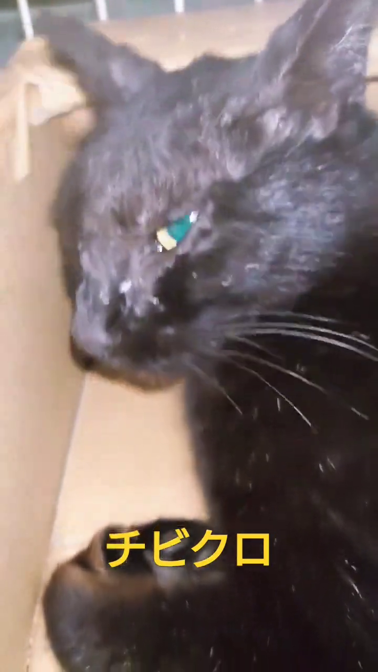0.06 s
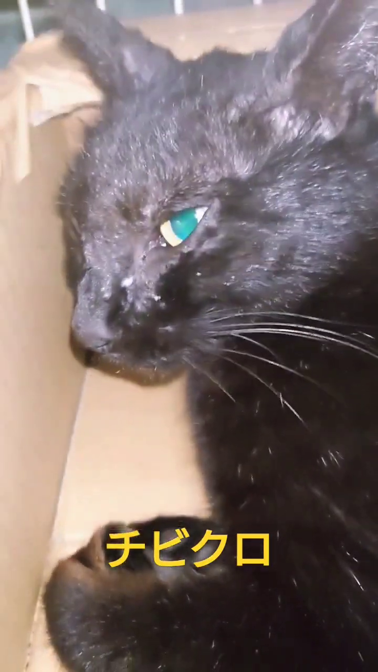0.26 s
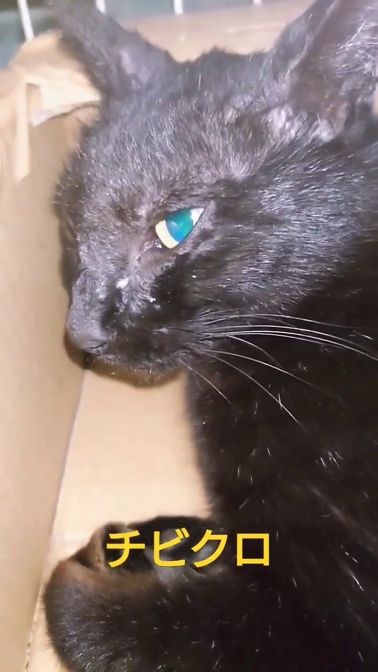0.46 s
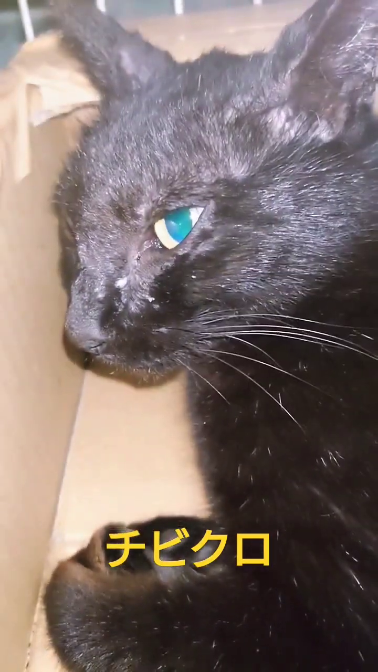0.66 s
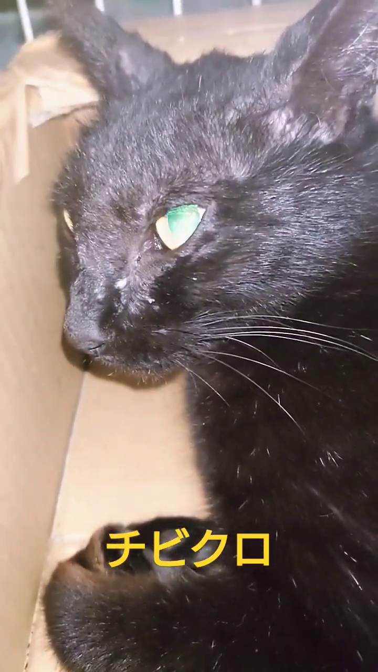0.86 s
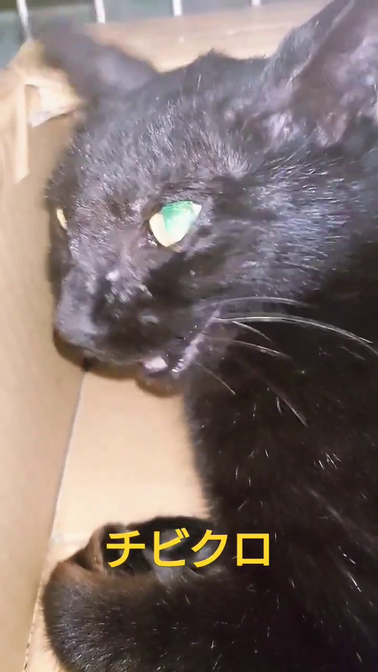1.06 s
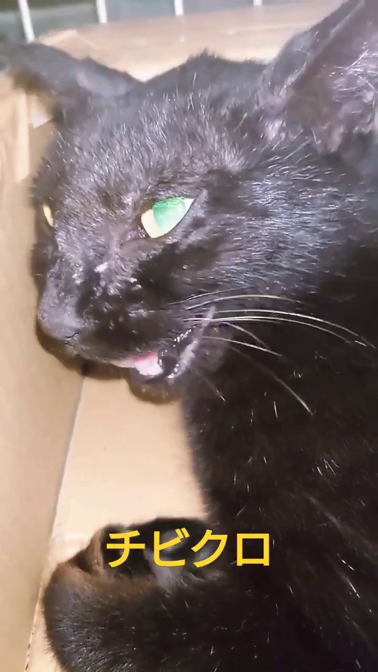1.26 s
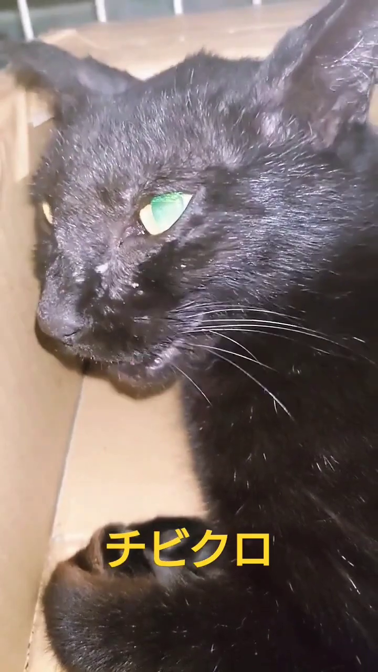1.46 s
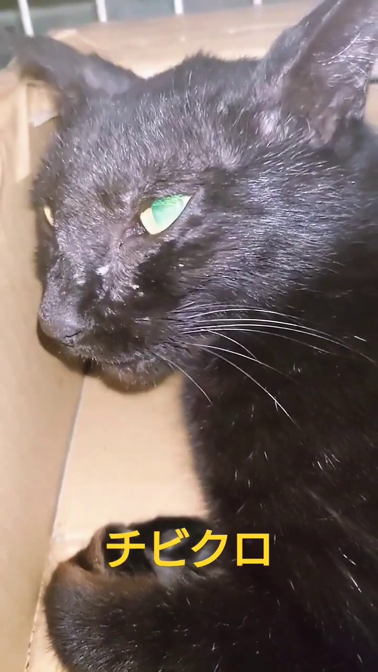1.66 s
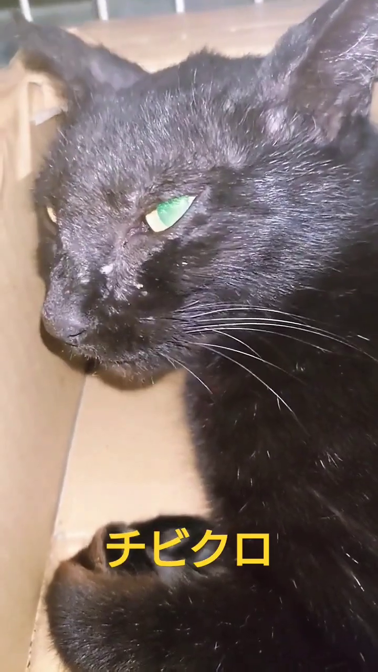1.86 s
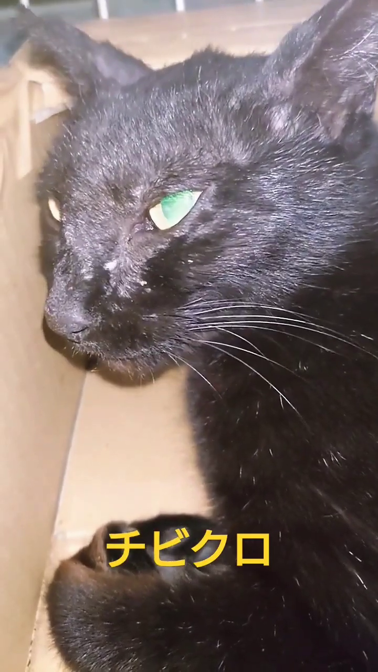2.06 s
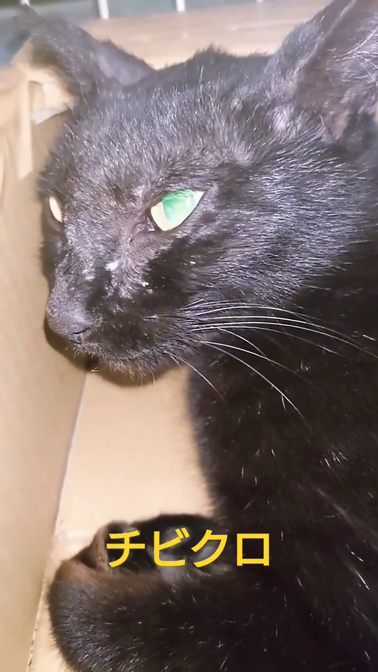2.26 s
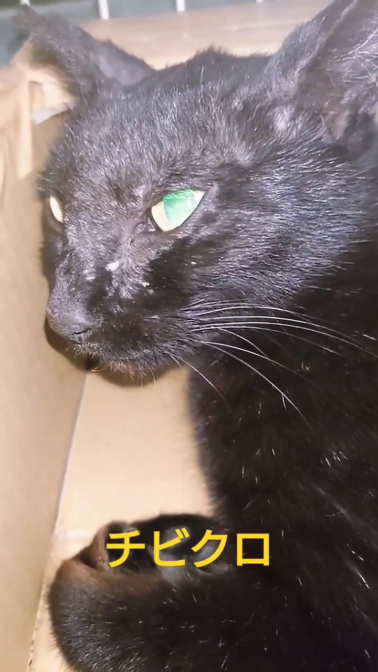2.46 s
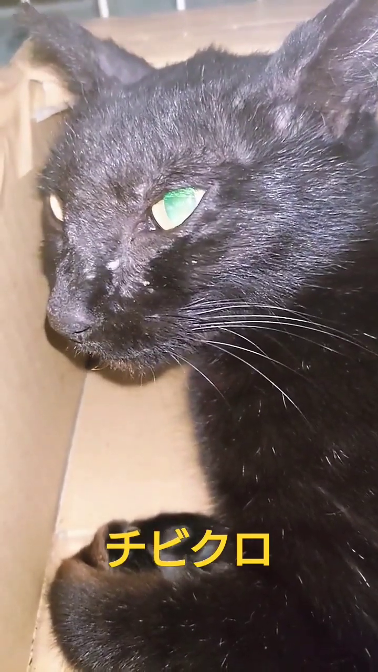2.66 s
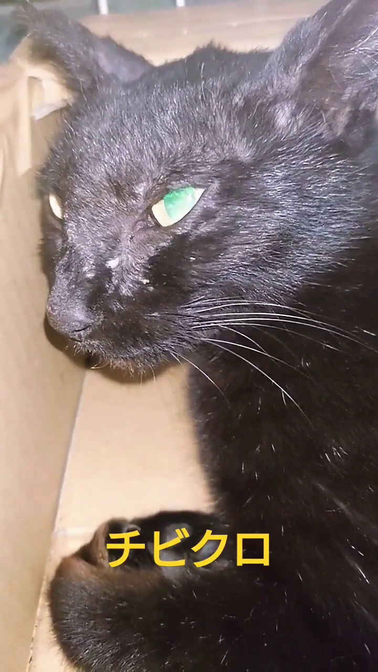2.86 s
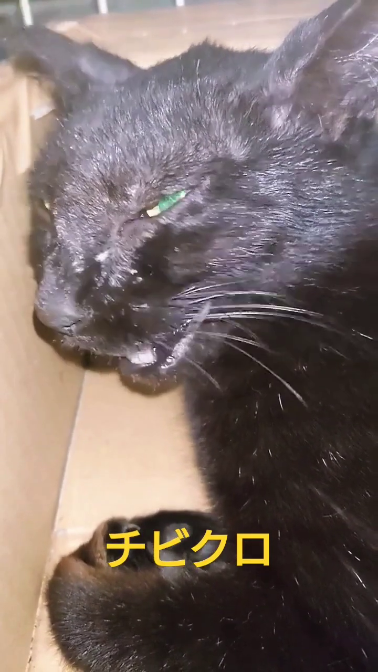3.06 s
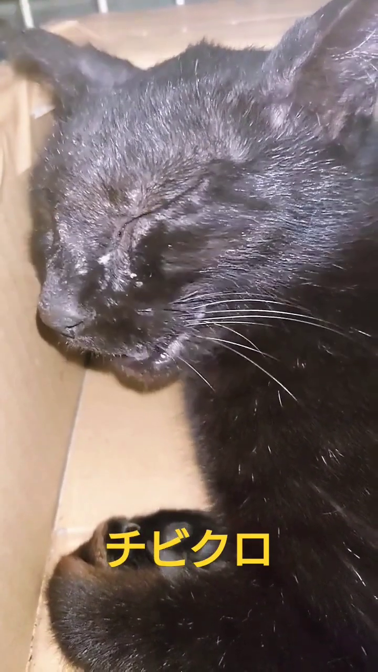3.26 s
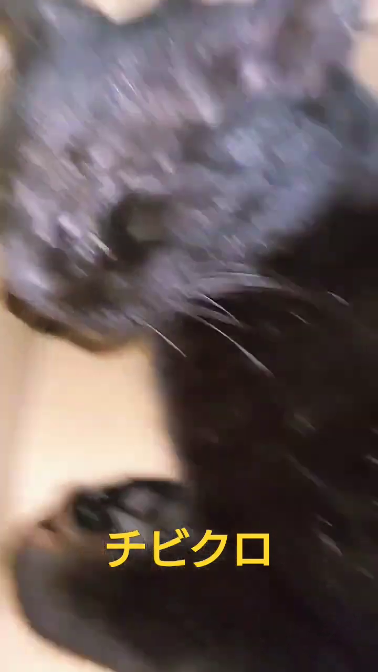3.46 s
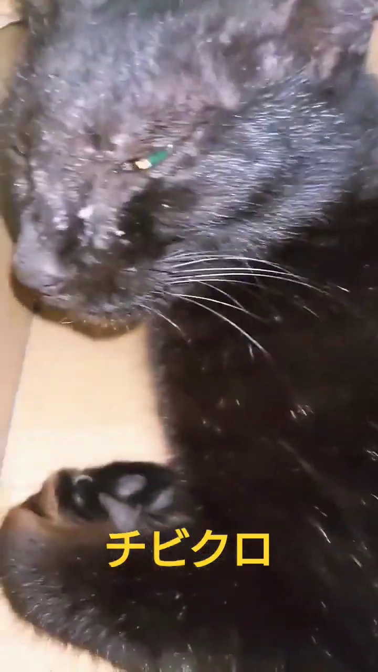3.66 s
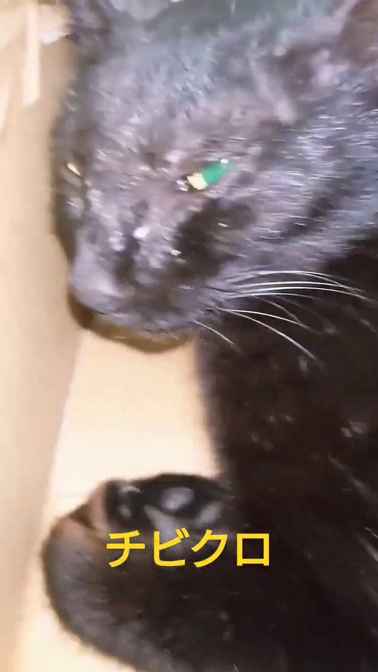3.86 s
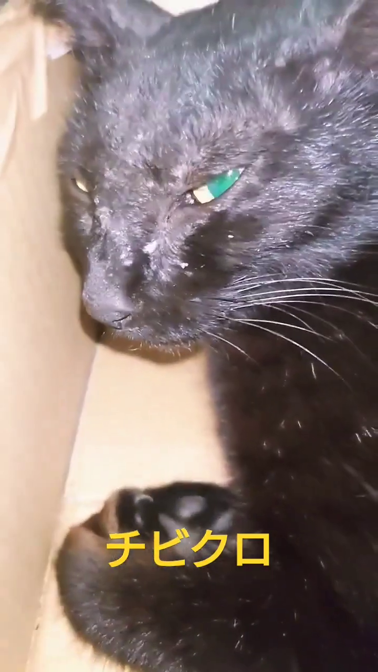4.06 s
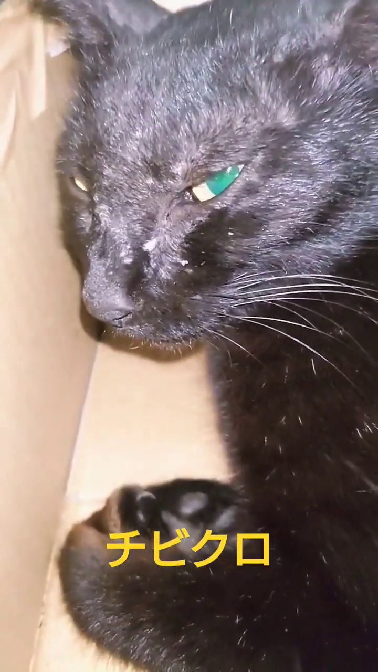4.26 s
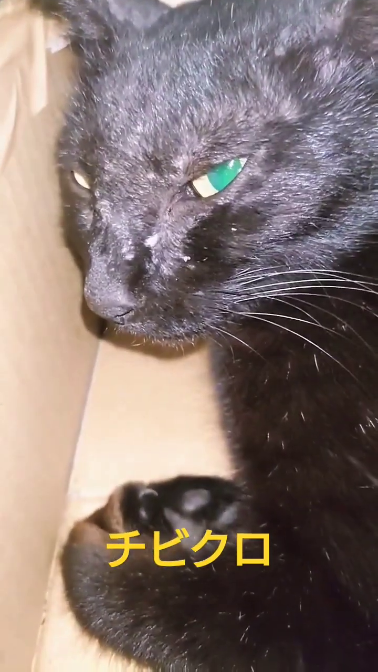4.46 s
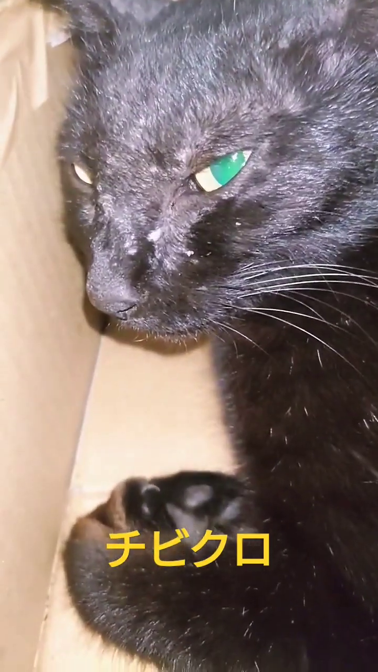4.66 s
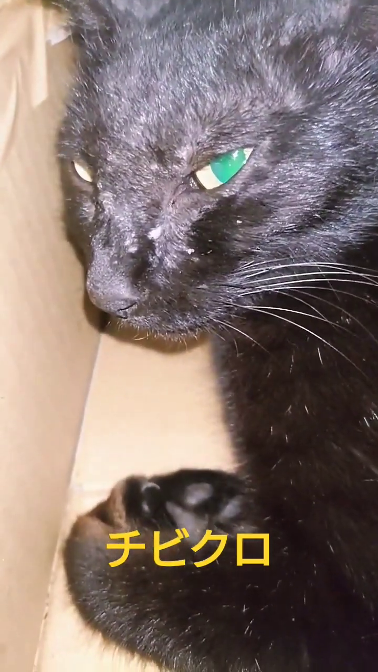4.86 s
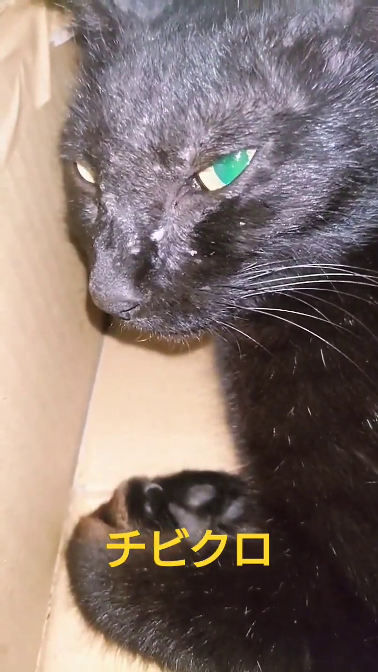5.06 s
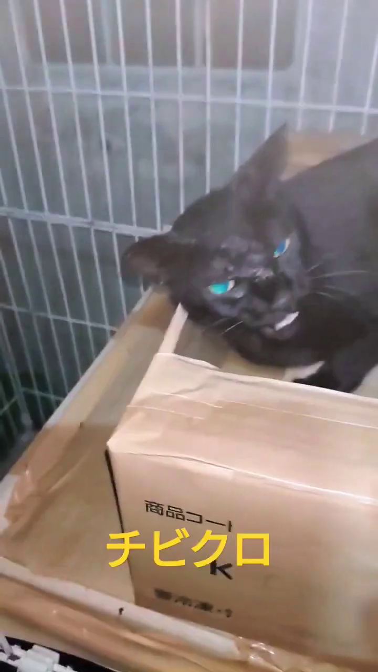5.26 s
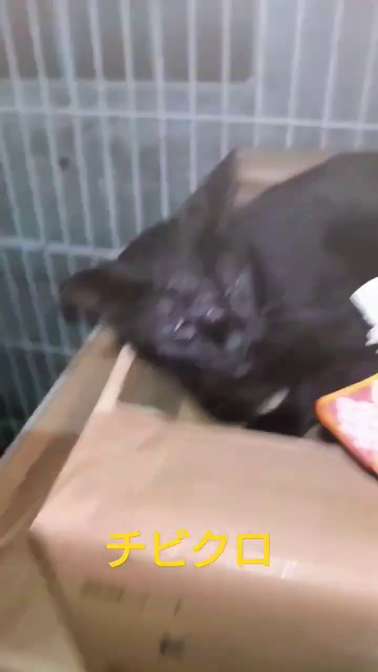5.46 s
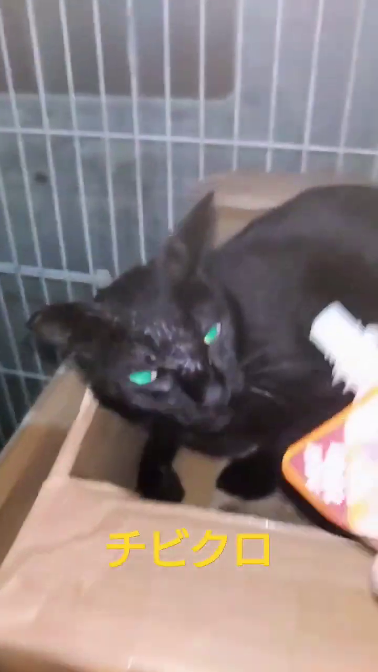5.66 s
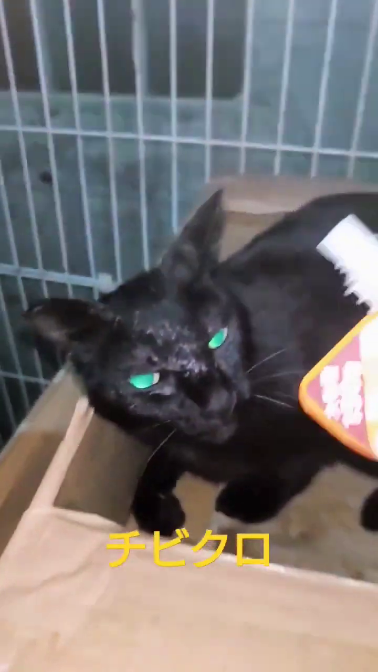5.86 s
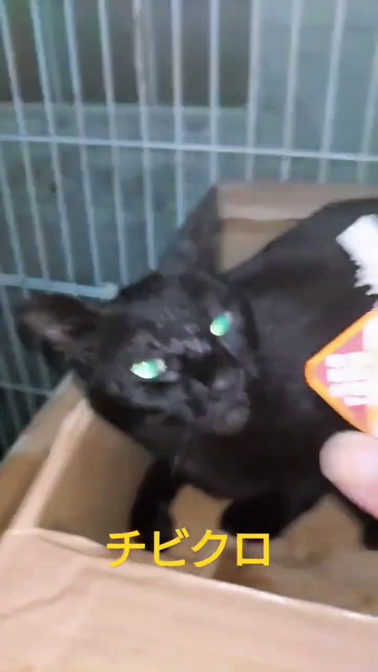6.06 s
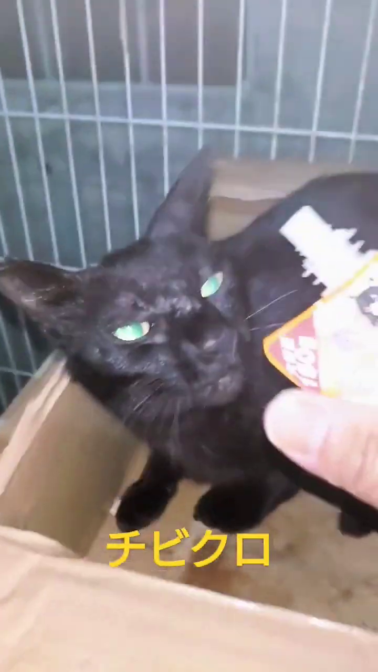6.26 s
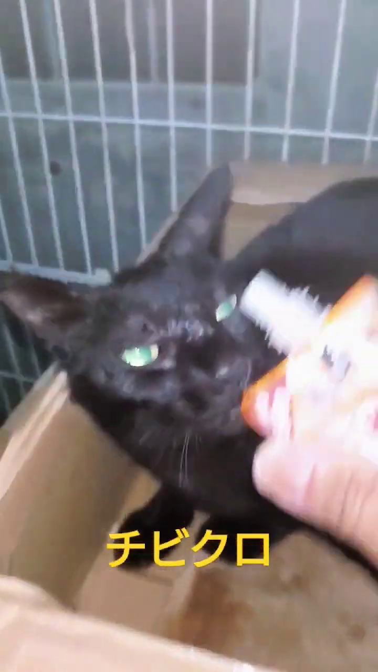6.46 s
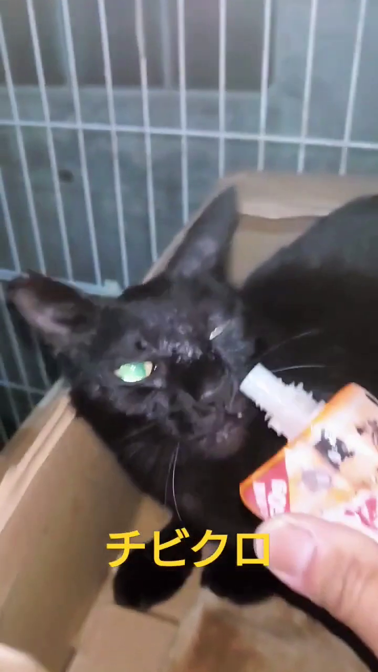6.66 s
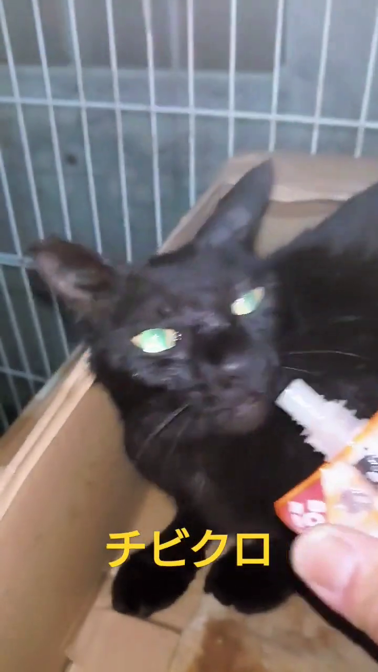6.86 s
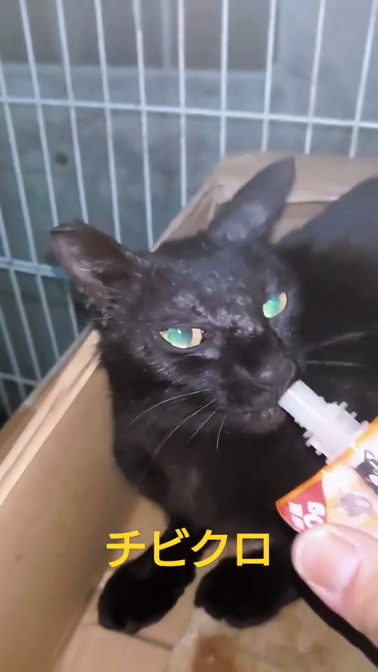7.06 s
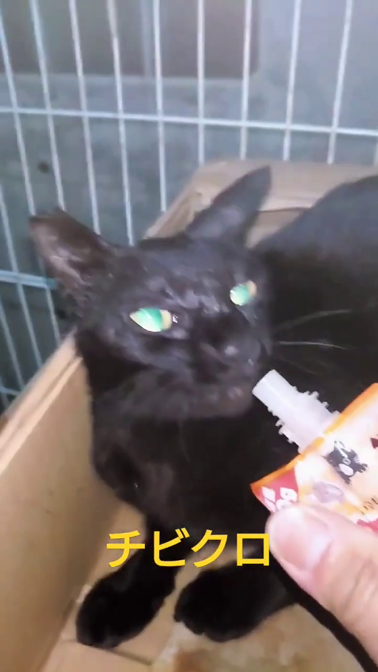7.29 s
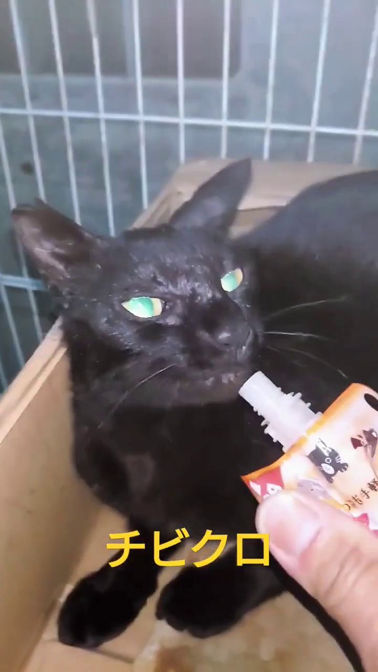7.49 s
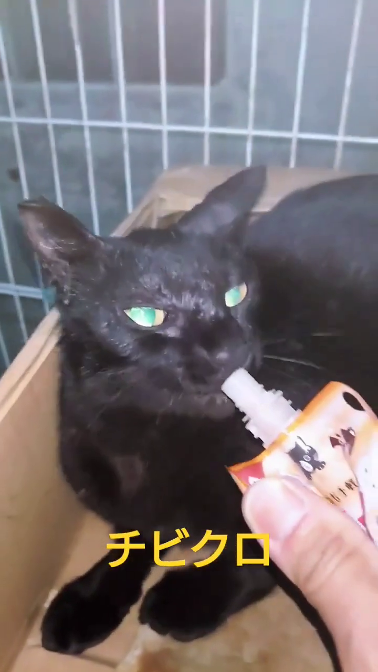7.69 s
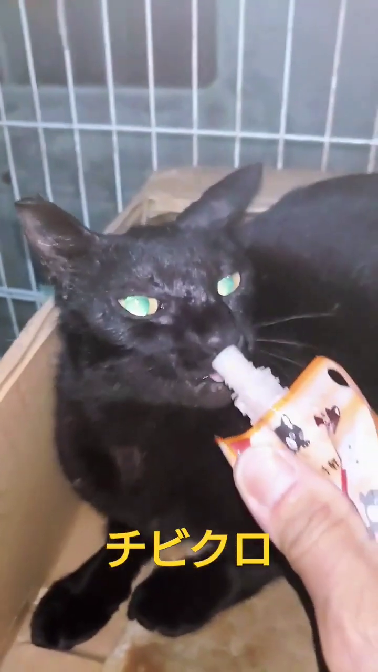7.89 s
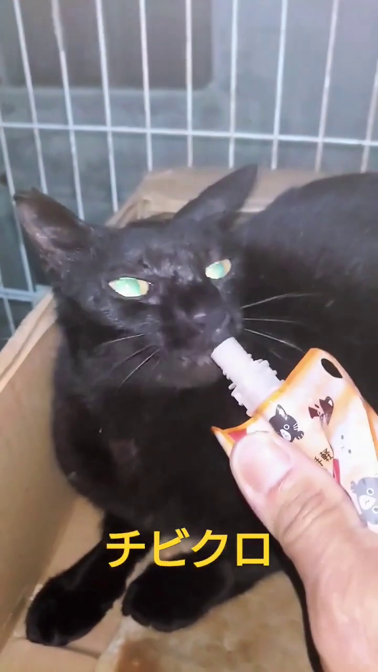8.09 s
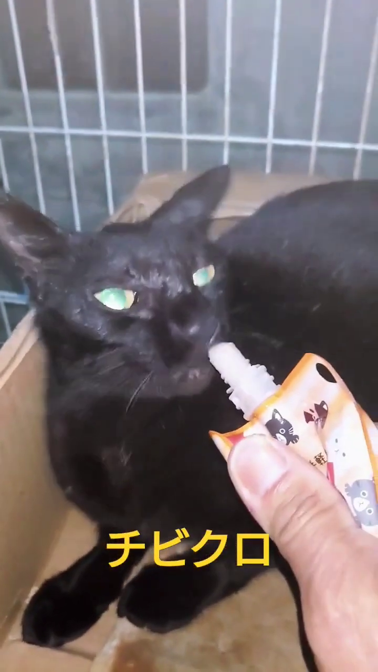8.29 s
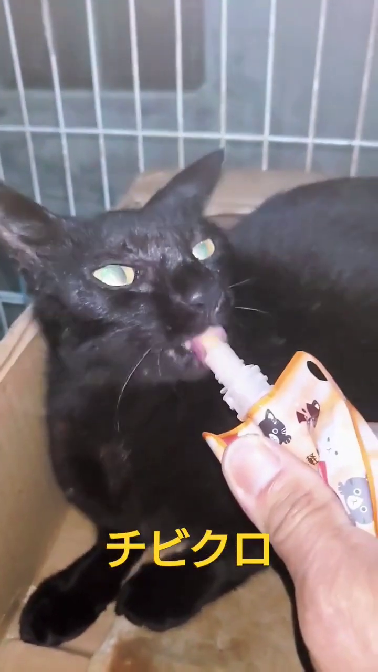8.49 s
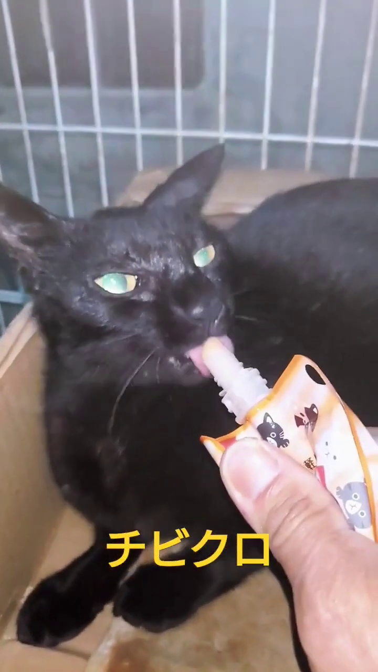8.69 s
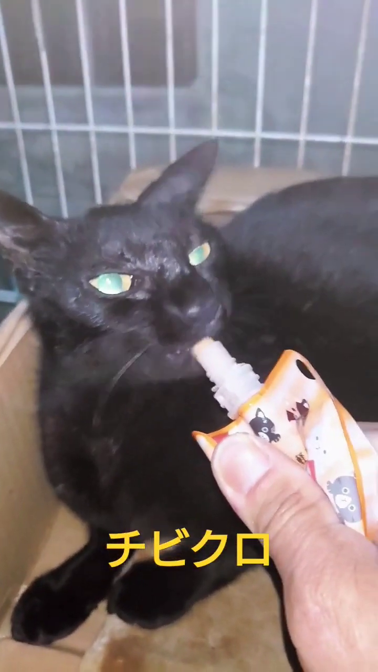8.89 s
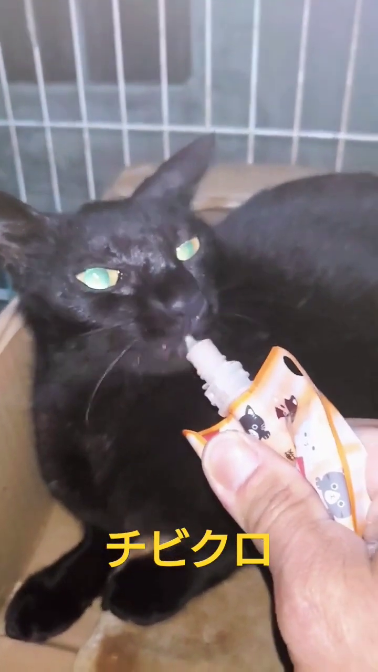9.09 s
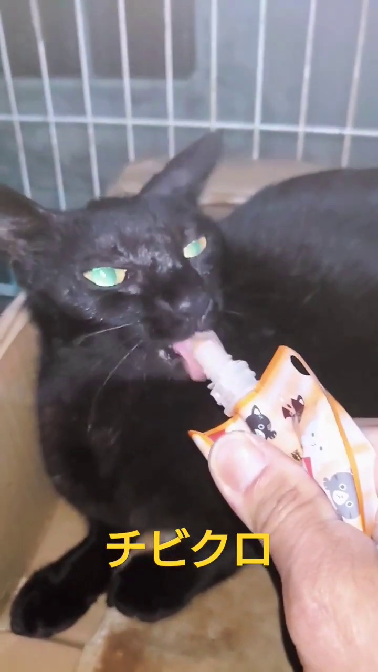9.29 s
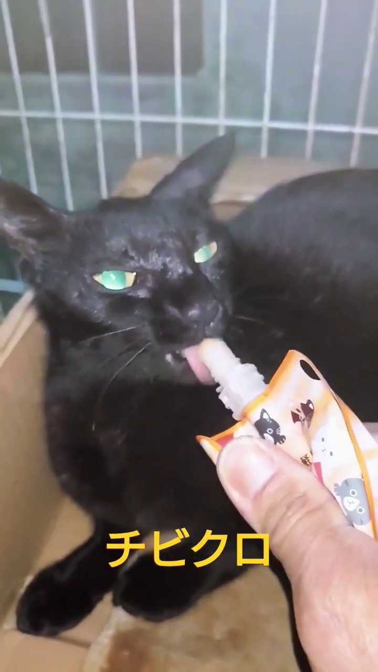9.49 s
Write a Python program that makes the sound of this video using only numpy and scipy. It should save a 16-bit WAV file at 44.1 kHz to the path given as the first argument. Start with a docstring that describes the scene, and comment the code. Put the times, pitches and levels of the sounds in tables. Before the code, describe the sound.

A cat meows in a small indoor space, caught closely in stereo by a phone with faint hiss. The end of a meow is already sounding at 0 and stops by 0.15 s. A full one, mid-high and slightly nasal, sags then lifts in pitch from 1.25 to 2.05 s; another similar follows from 3.15 to 3.7 s. Soft cardboard thumps and scuffs come at 3.6-4.1 s, with faint low rumble beneath. Near 5.27 s there is a tiny silent cut, then a thinner, bright meow from further off and aside until 5.77 s. Knocks, scuffs and crisp ticks cluster at 5.5-6.8 s, with a sharp tick at 7.0 s and quick dull mouth clicks around 7.1 s. Shifting calms; isolated clicks at 7.75, 7.95 and 8.37 s stand out, then only tiny lapping clicks remain until about 9.5 s.

```python
"""Small room, cardboard box: a cat inside meows four times close to a phone with two far-apart microphone ports.
Each meow sums overtones of the fold pulses, shaped by throat and moving mouth resonance, with breath noise.
A splice comes ahead of the last meow, which is heard from further off and aside.
Around and mostly after it the cat shifts: filtered noise scuffs and thuds knock on the cardboard; short ringing
bursts are the ticks of food pouch and claws and the clicks of the feeding mouth. Noise rumbles and hisses faintly."""
import sys
import numpy as np
from scipy import signal
from scipy.fft import rfft, irfft, next_fast_len
from scipy.io import wavfile
from scipy.ndimage import uniform_filter1d, map_coordinates

SR = 44100
rng = np.random.default_rng(int(sys.argv[2]) if len(sys.argv) > 2 else 0)


def to_linear_factor(level_db):
    """Convert decibel levels (scalar or array-like) to linear amplitude factors."""
    exponent = np.asarray(level_db, float) / 20
    return 10 ** exponent


def pcm_store(signal):
    """Save signal as 16-bit PCM."""
    levels = np.round(np.clip(np.atleast_2d(signal), -1, 1) * 32767)
    wavfile.write(sys.argv[1], SR, levels.astype(np.int16).T)


N = 420273

# Levels are set ahead of the microphones' own response.
# silence of the splice: start t/s, end t/s
SPLICE = (5.268, 5.287)

# room murmur and microphone hiss: f/Hz, relative density level/dB
AIR_SPECTRUM = [(41, -66), (70, 0), (207, -12), (311, -6.5), (1010, -21.5), (5900, -33), (7300, -40.5),
                (9000, -32.5), (15500, -34)]
# left-right likeness of the air: f/Hz, correlation
AIR_LIKENESS = [(900, 0.03)]
# left over right port in the air: f/Hz, L-R level/dB
AIR_TILT = [(80, -8.5), (1200, 0)]
# deep rumble: t/s, level/dB
RUMBLE = [(3.3, -60), (3.7, -55.5)]
AIR_DB = -73
# decay of the room: f/Hz, t60/s
ROOM_DECAY = [(300, 0.38), (10000, 0.0082)]

# resonances of the cardboard wall: f/Hz, width/Hz, relative level/dB
BOX_MODES = [(95, 70, -6), (250, 13, 3), (340, 60, -3), (620, 250, -15)]
# knocks on the box wall: t/s, peak level/dB as the mean of both ports
KNOCKS = [(3.636, -48), (3.682, -37), (3.744, -38), (3.795, -42.5), (5.548, -39), (5.637, -27.5),
          (5.671, -33.5), (5.818, -42.5), (6.094, -33), (6.179, -42), (6.537, -42.5), (6.605, -37),
          (6.654, -41), (8.374, -45.5)]
# colour of the scuffs: f/Hz, relative density level/dB
SCUFF_SPECTRUM = [(380, -21), (680, 1), (1090, -5), (2570, -8), (4400, -22), (5700, -15), (6900, -29),
                  (9000, -19.5)]
# strokes of fur and paws on cardboard: start t/s, length/s, wall level/dB, scuff level/dB
STROKES = [(3.618, 0.17, -61.5, -67), (3.895, 0.22, -64, -74), (4.955, 0.11, -66, -98.5),
           (5.609, 0.042, -57, -59), (5.95, 0.083, -83, -59), (6.092, 0.018, -52, -60),
           (6.174, 0.03, -76, -61), (6.519, 0.037, -47, -57.5), (6.589, 0.08, -49, -61.5),
           (6.784, 0.0048, -49, -61)]
# the cat's steady shifting after the splice, calming as it feeds: t/s, wall level/dB, scuff level/dB
RESTLESS = [(5.287, -73, -64), (5.7, -53.5, -66), (6.0, -66.5, -67), (6.35, -60.5, -64.5), (6.7, -63, -72),
            (7.3, -58, -65.5), (7.46, -76.5, -70), (7.8, -69, -74.5), (8.3, -79.5, -76.5),
            (8.6, -64.5, -76.5), (9.53, -84.5, -79.5)]
RISE_DB_PER_S, FALL_DB_PER_S = 591, 171

# snaps of pouch and claws: t/s, body peak level/dB, own ring f/Hz, crack level/dB re body
TICKS = [(3.622, -40.5, 2500, 9.5), (3.743, -37, 4100, 10.5), (5.6171, -29, 2400, -16),
         (5.637, -31, 2280, -6), (5.6694, -34, 2998, -3.5), (5.9558, -24, 2380, 3), (6.0843, -32, 2130, 1),
         (6.1785, -33.5, 3830, 2), (6.7793, -42.5, 1180, -20), (7.001, -24.5, 2420, -4),
         (7.473, -50.5, 5560, 0), (7.9489, -29, 3380, -8.5), (8.7001, -44, 1900, -13),
         (8.9476, -43, 2020, -14)]
# dull clicks of tongue and lips: t/s, body peak level/dB, own ring f/Hz
SMACKS = [(6.093, -37, 1160), (6.485, -44, 780), (6.947, -46, 1730), (6.983, -44, 2200),
          (7.0929, -37, 1820), (7.1118, -39, 1810), (7.134, -39.5, 1730), (7.192, -40, 1780),
          (7.611, -51.5, 1640), (7.751, -31.5, 1280), (8.118, -51.5, 1600), (8.208, -55, 1420),
          (8.279, -53, 2230), (8.3731, -34, 1510), (8.6794, -51.5, 2300), (9.107, -53, 2400),
          (9.213, -49, 2300)]
SMACK_CRACK_DB = -71  # re body
# ring of the plastic crack: f/Hz, width/Hz, relative level/dB
PLASTIC_MODES = [(5530, 730, 31), (10500, 3100, -21)]
# air in the box answering each click: f/Hz, width/Hz, relative level/dB
HOLLOW_MODES = [(876, 810, -2.5), (2230, 170, 8)]
HOLLOW_DB, HOLLOW_T60_S = -17.5, 0.19  # level re click

# meows: t/s, mean pitch f/Hz, fundamental level/dB, mouth overtone level/dB, mouth resonance f/Hz
MEOWS = [
    [(0.0, 491, -37, -54.5, 2870), (0.06, 511.5, -38, -62.5, 3000), (0.145, 521, -38.5, -61.5, 2760)],
    [(1.247, 548, -44, -49, 2850), (1.3, 525.6, -40, -41, 2710), (1.37, 496.5, -35.5, -39.5, 3190),
     (1.45, 470.6, -37.5, -39.5, 3380), (1.6, 471.3, -39, -47, 3308), (1.91, 478.6, -39, -58, 2910),
     (2.047, 512, -42, -58, 2852)],
    [(3.152, 531, -42, -48, 2590), (3.23, 488.3, -38.5, -42, 2720), (3.37, 454.1, -37, -40, 3070),
     (3.5, 465.5, -38, -47, 3050), (3.63, 480.2, -39.5, -56, 3100), (3.715, 527.4, -39.5, -57.5, 3175)],
    [(5.287, 429.2, -51.5, -39, 3370), (5.4, 445.6, -62, -41, 3550), (5.52, 451.7, -61.5, -46, 3550),
     (5.66, 479.5, -50.5, -63, 3050), (5.722, 474.6, -62, -59, 3240), (5.728, 459, -60, -69, 3250),
     (5.765, 432, -44.5, -64, 2716)],
]
# every second fold cycle turns weaker: centre t/s, spread/s, share 0-1
DOUBLING = [(0.093, 0.054, 0.14), (1.981, 0.039, 0.36), (3.691, 0.024, 0.39), (5.74, 0.03, 0.18)]
# throat resonances from the front: f/Hz, width/Hz, relative level/dB
NEAR_THROAT_MODES = [(696, 2500, 5.5), (1530, 2200, 5.8)]
# throat resonances from aside: f/Hz, width/Hz, relative level/dB
FAR_THROAT_MODES = [(930, 200, 3.5), (1680, 1100, -7.5)]
# skull ringing with the mouth: f/Hz, width/Hz, relative level/dB
SKULL_MODES = [(5794, 320, -2), (7060, 380, -4), (9100, 2700, -13)]
# voice at the ports before the splice: f/Hz, L-R level/dB
NEAR_TILT = [(150, -6.5), (1000, -10), (2800, -6), (8000, -33)]
# voice at the ports after the splice: f/Hz, L-R level/dB
FAR_TILT = [(400, -2), (1300, 2.5), (8000, -9)]
# a pocket under the tongue swallows a band this far below the mouth resonance
DIP_BELOW_HZ, DIP_WIDTH_HZ, DIP_DB = 720, 600, -1
# throat overtones follow the mouth's level part of the way from LOUD_DB
LOUD_DB, NEAR_THROAT_DB, NEAR_FOLLOW, FAR_THROAT_DB, FAR_FOLLOW = -36.5, -37, 0.47, -39.5, 0.26
# they start weaker at the onset and fade as the folds slacken
ONSET_S, ONSET_CUT_DB, SLACKEN_S, SLACKEN_DB = 0.061, 5.5, 0.042, 11
# mouth overtones fade above CLEAR_HZ; the breath, re mouth level, outlasts the voice
CLEAR_HZ, BREATH_DB, SIGH_S = 10500, -17.5, 0.03
NEAR_JITTER, FAR_JITTER = 0.004, 0.0065  # unsteadiness of the pitch, share

NEAR_LEAD_S, FAR_LEAD_S, TICK_LEAD_S = 0.00019, 0.00006, 0.00012  # left port hears first
MIC_TOP_HZ = 15750


def unit(x):
    """Scale to rms 1."""
    return x / np.sqrt(np.mean(x ** 2) + 1e-20)


def along(points, hz):
    """Interpolate (f/Hz, value) points on a log frequency axis."""
    f, v = np.transpose(points)
    return np.interp(np.log(hz + 1), np.log(f + 1), v)


def curves(rows, t, outside=None):
    """Interpolate each column after the first over time."""
    s, *cols = np.transpose(rows)
    return [np.interp(t, s, c, outside, outside) for c in cols]


def wobble(rate, size=N):
    """A smooth random curve with rate knots a second."""
    knots = rng.standard_normal(int(size * rate / SR) + 4)
    return map_coordinates(knots, [np.arange(size) * rate / SR])


def filtered(x, response):
    """Multiply the spectrum of x by a response of frequency."""
    n = x.shape[-1]
    m = next_fast_len(n + 8192)
    return irfft(rfft(x, m) * response(np.fft.rfftfreq(m, 1 / SR)), m)[..., :n]


def ringing(f, modes):
    """Causal response of (f/Hz, width/Hz, level/dB) resonances, with alternating signs."""
    total = 0
    for k, (centre, width, db) in enumerate(modes):
        damping = 1j * f * width
        total = total + (-1) ** k * to_linear_factor(db) * damping / (centre * centre - f * f + damping)
    return total


def ports(x, tilt, lead_s):
    """Two ports hear one source at unlike level and time; their mean keeps the source's level."""
    def pair(hz):
        g = to_linear_factor(along(tilt, hz) / 2) * np.exp(1j * np.pi * hz * lead_s)
        return np.array([g, 1 / g]) / np.abs(g + 1 / g) * 2
    return filtered(x, pair)


def rush(gain, alike, patchy_db):
    """Stereo noise, rms 1 in its mid, with random patches of gain and a set left-right likeness."""
    z = signal.stft(rng.standard_normal((2, N)), nperseg=512)[2]
    field = rng.standard_normal(z.shape[1:])
    field = uniform_filter1d(uniform_filter1d(field, 6, 0), 8, 1)
    pair = signal.istft(z * to_linear_factor(patchy_db * unit(field)), nperseg=512)[1][:, :N]

    def mid_side(hz):
        turn = np.arccos(np.clip(along(alike, hz), -1, 1)) / 2
        return gain(hz) * [np.cos(turn), np.sin(turn)]
    mid, side = filtered(pair, mid_side)
    return np.array([mid + side, mid - side]) / np.std(mid)


def air():
    """Deep uneven rumble under the room's murmur and the microphone hiss, all filtered noise."""
    still = rush(lambda f: to_linear_factor(along(AIR_SPECTRUM, f)), AIR_LIKENESS, patchy_db=1.5)
    still = filtered(still, lambda f: to_linear_factor(along(AIR_TILT, f) * [[0.5], [-0.5]]))
    deep = rush(lambda f: np.abs(ringing(f, [(34, 30, 0)])) ** 4, [(30, 0.55)], patchy_db=0)
    rumble_db = curves(RUMBLE, np.arange(N) / SR)[0]
    return to_linear_factor(AIR_DB) * still + to_linear_factor(rumble_db) * deep * to_linear_factor([[-3.2], [2.2]])


def room(x):
    """The room answers with a noise tail in which each frequency dies at its own speed."""
    hz, t, z = signal.stft(rng.standard_normal((2, SR // 2)), SR, nperseg=256)
    decay = to_linear_factor(-60 * t / along(ROOM_DECAY, hz)[:, None])
    tail = signal.istft(z * decay, SR, nperseg=256)[1]
    late = np.pad(x, (300, 0))[None]  # first answer after 300 samples
    return signal.fftconvolve(late, tail / np.linalg.norm(tail[0]), axes=1)[:, :N]


def strokes(t):
    """Wall and scuff gains: every stroke rises, holds and falls, adding power to the steady shifting."""
    wall, scuff = to_linear_factor(np.array(curves(RESTLESS, t, -120))) ** 2
    for s, length, wall_db, scuff_db in STROKES:
        rise_db = -RISE_DB_PER_S * np.maximum(s - t, 0)
        fall_db = -FALL_DB_PER_S * np.maximum(t - s - length, 0)
        shape = to_linear_factor(rise_db + fall_db) ** 2
        wall = wall + to_linear_factor(wall_db) ** 2 * shape
        scuff = scuff + to_linear_factor(scuff_db) ** 2 * shape
    return np.sqrt(wall), np.sqrt(scuff)


def box():
    """Paws knock the cardboard; dragging fur shakes the wall and scuffs in clumped grains."""
    t = np.arange(N) / SR
    push = np.pad(np.hanning(44), (0, SR // 10))
    thud = filtered(push, lambda f: ringing(f, BOX_MODES))
    knock = np.zeros(N)
    for s, db in KNOCKS:
        knock[round(s * SR):][:len(thud)] += to_linear_factor(db) * thud / np.abs(thud).max()

    def wall_tone(f):
        return np.abs(ringing(f, BOX_MODES)) ** 0.9 / (1 + (f / 650) ** 4) / (1 + (110 / (f + 1)) ** 2)
    shake, scrape = strokes(t)
    wall = rush(wall_tone, [(200, 0.7)], patchy_db=2)
    scuff = rush(lambda f: to_linear_factor(along(SCUFF_SPECTRUM, f)), [(600, -0.34), (1600, -0.65)], patchy_db=1.8)
    bright = filtered(scuff, lambda f: np.abs(ringing(f, [(4030, 1730, 0.0093)])))
    scuff = scuff + scrape / to_linear_factor(-72.5) * bright  # harder strokes sound brighter
    grains = to_linear_factor(1.3 * wobble(35) + 2.6 * wobble(400))
    # each pair of levels is left and right port
    shaking = shake * to_linear_factor(1.8 * wobble(13)) * wall * to_linear_factor([[-1.6], [1.2]])
    scuffing = scrape * unit(grains) * scuff * to_linear_factor([[-4.5], [2.5]])
    return knock * to_linear_factor([[-2.5], [1.8]]) + shaking + scuffing


def ticks_and_smacks():
    """Short crackle rings a broad pitch of each click's own; the box answers with a fresh wash of noise."""
    clicks, wash = np.zeros(N), np.zeros((2, N))
    t = np.arange(6000) / SR
    rows = TICKS + [row + (SMACK_CRACK_DB,) for row in SMACKS]
    noises = rng.standard_normal((len(rows), 3, len(t)))
    for (s, db, hz, crack_db), (burst, *echo) in zip(rows, noises):
        start = round(s * SR)
        burst = burst * to_linear_factor(-60 * t * hz / 9)  # dies by 60 dB in nine cycles of its ring
        burst[0] = 4  # the first snap
        body = filtered(burst, lambda f: ringing(f, [(hz, 0.5 * hz, 0)]) ** 2 / (1 + 1j * f / (hz + 1500)) ** 2)
        crack = filtered(burst, lambda f: ringing(f, PLASTIC_MODES))
        click = body / np.abs(body).max() + to_linear_factor(crack_db) * crack / np.abs(crack).max()
        clicks[start:][:len(t)] += to_linear_factor(db) * click
        echo = unit(filtered(np.array(echo), lambda f: ringing(f, HOLLOW_MODES) / (1 + (f / 3200) ** 4)))
        wash[:, start:][:, :len(t)] += to_linear_factor(db + HOLLOW_DB - 60 * t / HOLLOW_T60_S) * echo
    return ports(clicks, [(1500, -15.5), (9000, -14)], TICK_LEAD_S) + wash


def meow(rows, loud_throat_db, follow, onset_cut_db, slacken_db, throat_modes, skull_db, cheek_db, jitter):
    """Fold pulses as overtones, shaped by throat and a moving mouth resonance, with breath once a cycle."""
    start, end = rows[0][0], rows[-1][0]
    t = np.arange(round(start * SR), round((end + 4 * SIGH_S) * SR)) / SR
    pitch, base_db, mouth_db, mouth_hz = curves(rows, t)
    # a meow already under way at time zero starts at full strength
    onset_db = (start > 0) * onset_cut_db * np.maximum(1 - (t - start) / ONSET_S, 0)
    ending_db = slacken_db * np.maximum(1 - (end - t) / SLACKEN_S, 0)
    # both are taken off, so the throat starts and ends weaker
    throat_db = loud_throat_db + follow * (mouth_db - LOUD_DB) - (onset_db + ending_db)
    uneven = sum(share * np.exp(-((t - s) / spread) ** 2) for s, spread, share in DOUBLING)
    slow = 0.0027 * wobble(40, size=len(t))
    creak = (jitter + 0.03 * uneven) * wobble(400, size=len(t))  # uneven cycles creak
    pitch = pitch * (1 + slow + creak)

    # gains are worked out every 64 samples, for whole and halfway multiples of the pitch
    step = slice(None, None, 64)
    half = np.arange(1, 65)[:, None] / 2
    whole = half % 1 == 0
    hz = half * pitch[step]
    share = np.where(whole, 1, uneven[step])  # halfway lines appear as the cycles alternate
    low_first = np.where(whole, 1, (2 / half) ** 2)  # the lowest halfway lines are the strongest
    dip = 2.5 - ringing(hz, [(mouth_hz[step] - DIP_BELOW_HZ, DIP_WIDTH_HZ, DIP_DB)])
    throat = share * low_first * dip * ringing(hz, throat_modes) * (half > 1) / (1 + (hz / 2100) ** 8)

    def head(f):
        cheek = to_linear_factor(cheek_db) * ringing(f, [(2280, 310, 0.034)]) ** 2
        return cheek + to_linear_factor(skull_db) * ringing(f, SKULL_MODES) ** 2

    def hollow(f):  # a side cavity swallows this band
        return 1 - ringing(f, [(4600, 1700, 0)])

    def level(part):  # the overtones together reach rms 1
        return part / np.sqrt(np.sum(np.abs(part) ** 2, axis=0) / 2)
    mouth = ringing(hz, [(mouth_hz[step], 650, 0)]) ** 2 + head(hz)
    mouth = share * mouth * dip * hollow(hz) / (1 + (hz / CLEAR_HZ) ** 7)
    base = np.sqrt(2) * ((half == 1) + 0.11 * share * (half < 1))
    gains = to_linear_factor(base_db[step]) * base + to_linear_factor(throat_db[step]) * level(throat) + to_linear_factor(mouth_db[step]) * level(mouth)
    # tongue and jaw never rest: each overtone swells and fades on its own, the high ones most
    drift = rng.standard_normal(gains.shape)
    drift = uniform_filter1d(uniform_filter1d(drift, 18, axis=1), 18, axis=1)
    gains = gains * to_linear_factor(np.minimum(0.5 * half, 2.2) * unit(drift))

    phase = 2 * np.pi * np.cumsum(pitch) / SR
    voice = 0
    for k, g in zip(half[:, 0], gains):
        gain = np.interp(t, t[step], g.real) + 1j * np.interp(t, t[step], g.imag)
        voice = voice + np.real(gain * np.exp(1j * k * phase))

    def breath_tone(f):
        return (ringing(f, [(3400, 3100, -2.5)]) ** 2 + 0.35 * head(f) + to_linear_factor(-22)) * hollow(f)
    puffs = rng.standard_normal(len(t)) * (1 + 1.1 * np.cos(phase))
    breath = unit(filtered(puffs, breath_tone))
    edge = np.clip(np.minimum((t - start) / 0.0016, (end - t) / 0.0019), 0, 1)
    sigh = np.clip((t - start) / 0.0053, 0, 1) * np.exp(-(np.maximum(t - end, 0) / SIGH_S) ** 2)
    return edge * voice + sigh * to_linear_factor(mouth_db + BREATH_DB) * breath


def cat():
    """The meows at the two ports, from close by and, after the splice, from further off and aside; and dry."""
    near, far = np.zeros((2, N))
    for rows in MEOWS[:-1]:
        call = meow(rows, NEAR_THROAT_DB, NEAR_FOLLOW, ONSET_CUT_DB, SLACKEN_DB, NEAR_THROAT_MODES,
                    skull_db=-4.0, cheek_db=-4.5, jitter=NEAR_JITTER)
        near[round(rows[0][0] * SR):][:len(call)] = call
    rows = MEOWS[-1]
    call = meow(rows, FAR_THROAT_DB, FAR_FOLLOW, ONSET_CUT_DB, -0.5, FAR_THROAT_MODES,
                skull_db=-21.5, cheek_db=2.5, jitter=FAR_JITTER)
    far[round(rows[0][0] * SR):][:len(call)] = call
    return ports(near, NEAR_TILT, NEAR_LEAD_S) + ports(far, FAR_TILT, FAR_LEAD_S), near + far


def scene():
    """Cat, clicks, room, box and air, silent during the splice."""
    voice, dry_voice = cat()
    clicks = ticks_and_smacks()
    t = np.arange(N) / SR
    fade_out = (SPLICE[0] - t) / 0.012
    fade_in = (t - SPLICE[1]) / 0.00011
    gate = np.clip(np.maximum(fade_out, fade_in), 0, 1)
    return gate * (voice + clicks + to_linear_factor(-16.5) * room(dry_voice) + box() + air())


def top_cut(x):
    """Nothing passes above the cut-off."""
    return signal.sosfilt(signal.butter(12, 16480, fs=SR, output="sos"), x)


def record(dry):
    """The phone's microphones drop steeply at the very top, down to a floor of 0.09 under a gain of 1.09."""
    heard = filtered(dry, lambda f: 1 / (1 + (f / MIC_TOP_HZ) ** 90) + 0.09)
    return top_cut(heard)


dry = scene()
out = record(dry)
pcm_store(out)
```